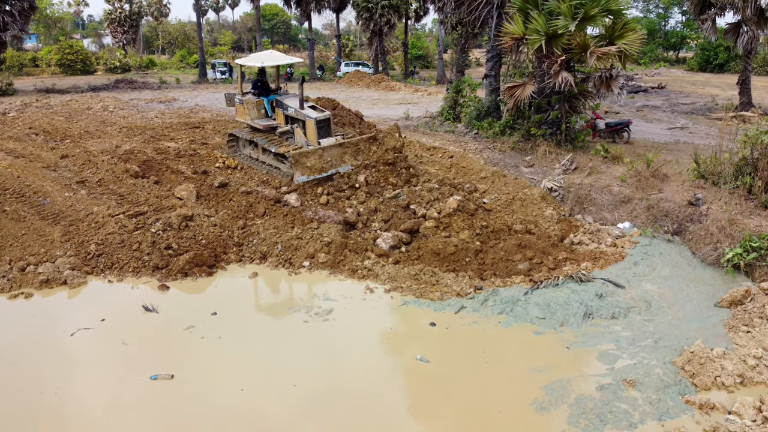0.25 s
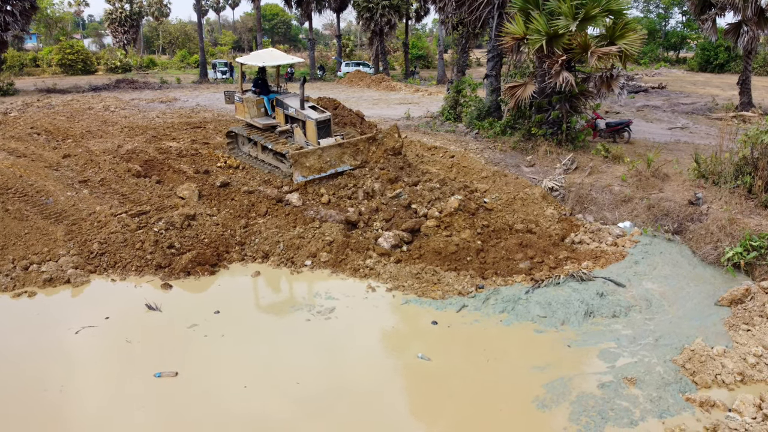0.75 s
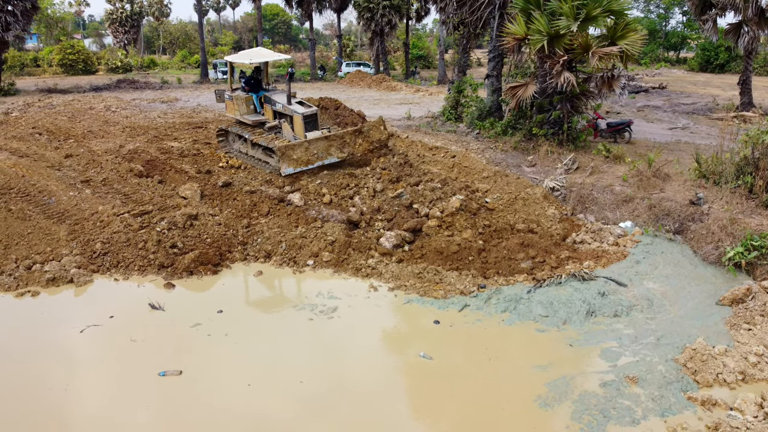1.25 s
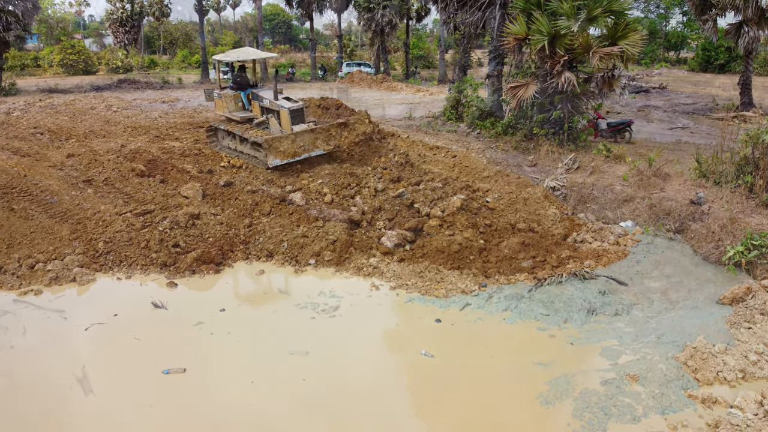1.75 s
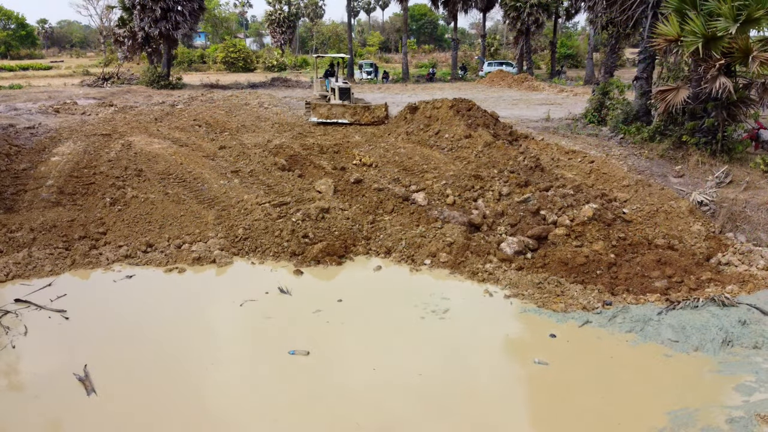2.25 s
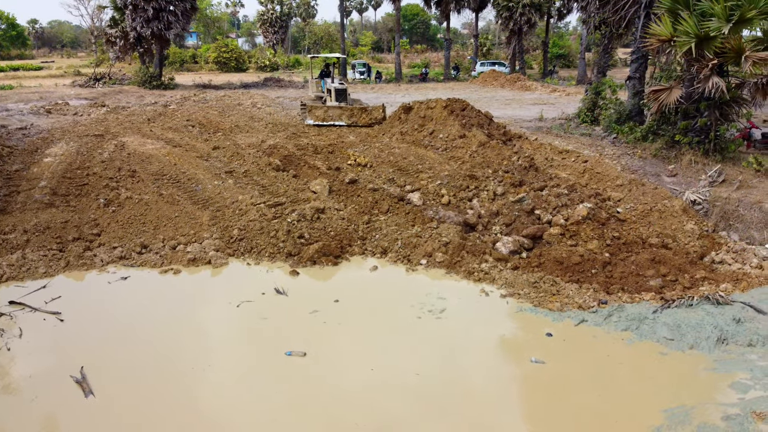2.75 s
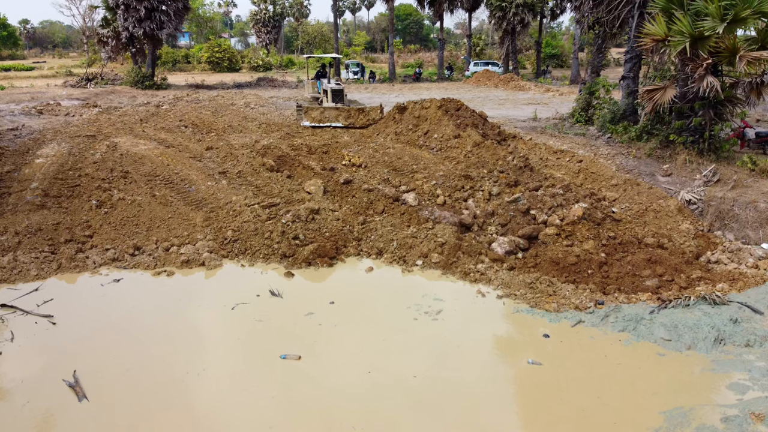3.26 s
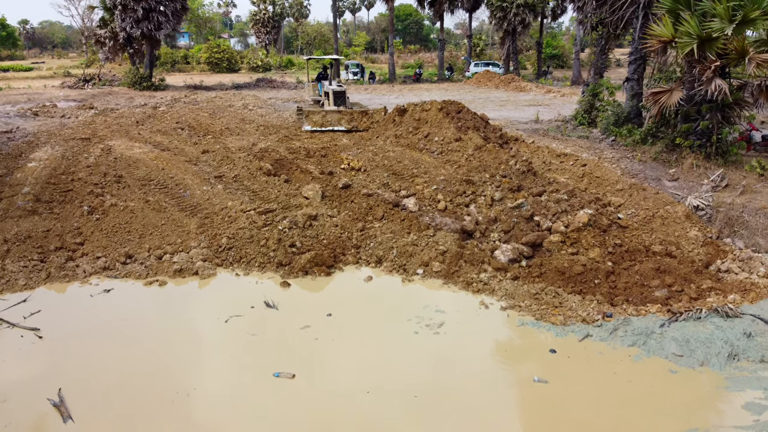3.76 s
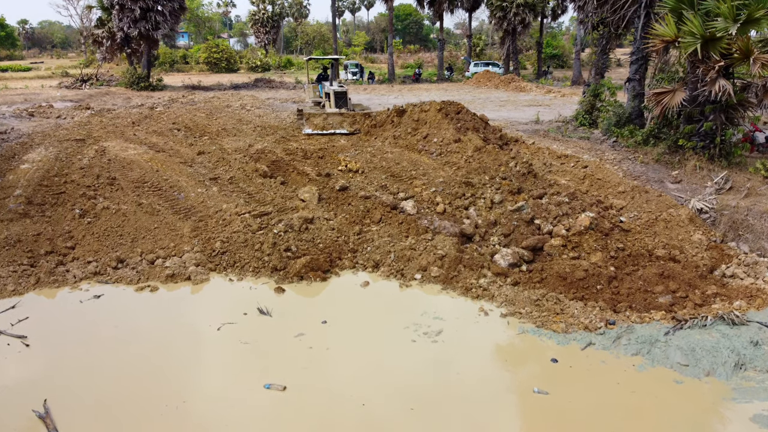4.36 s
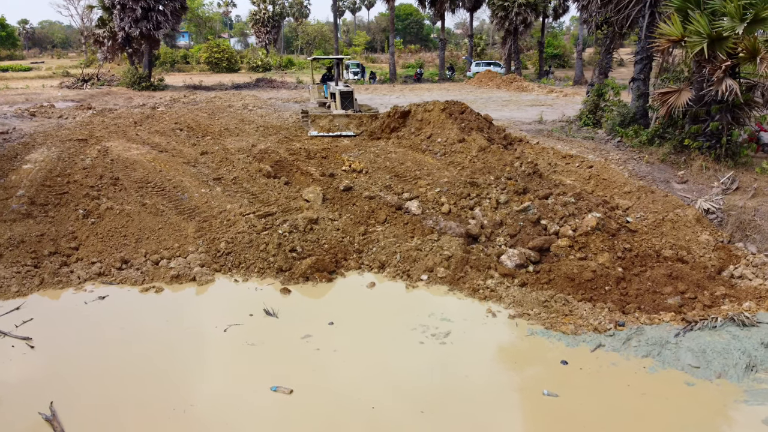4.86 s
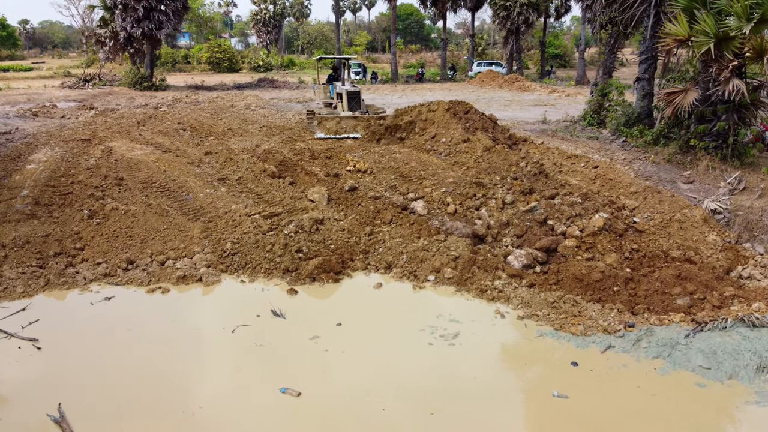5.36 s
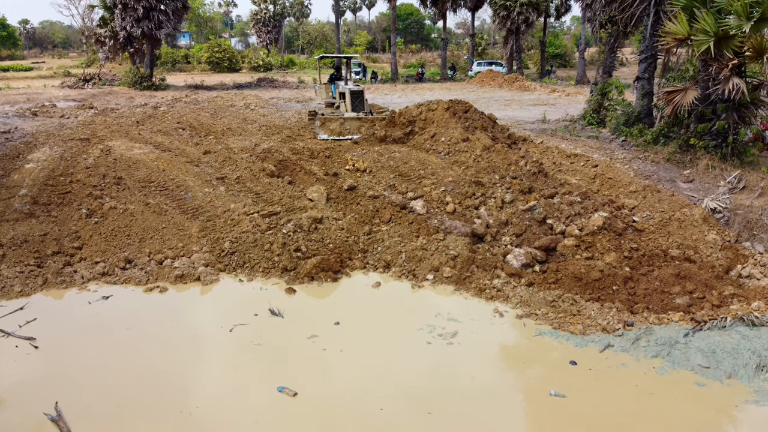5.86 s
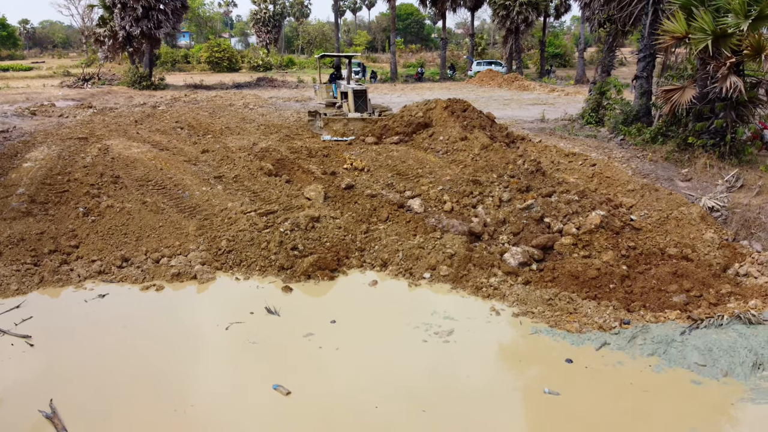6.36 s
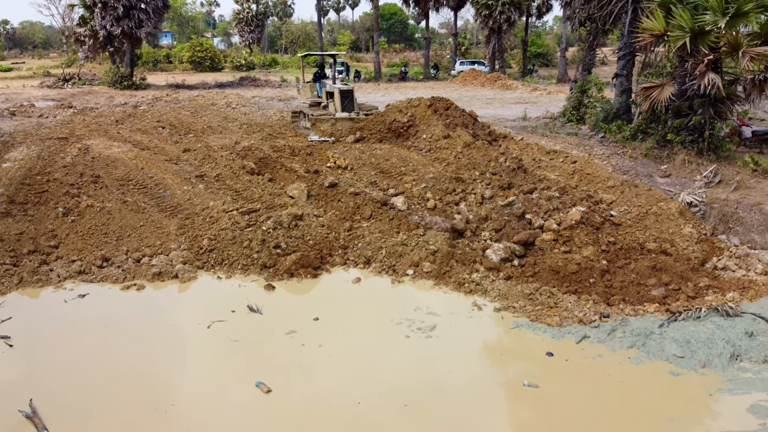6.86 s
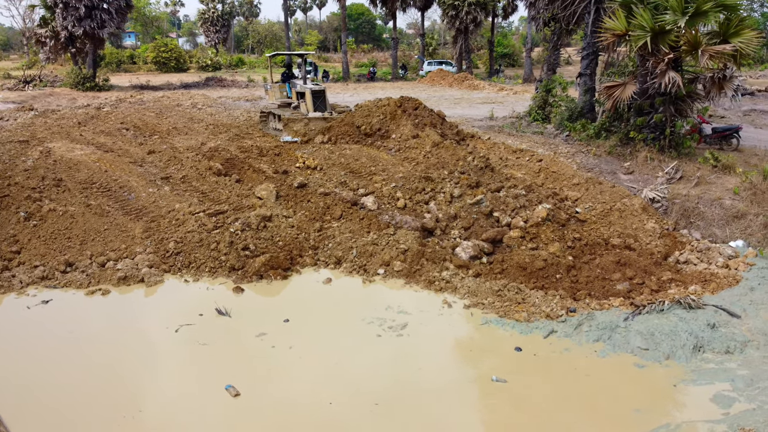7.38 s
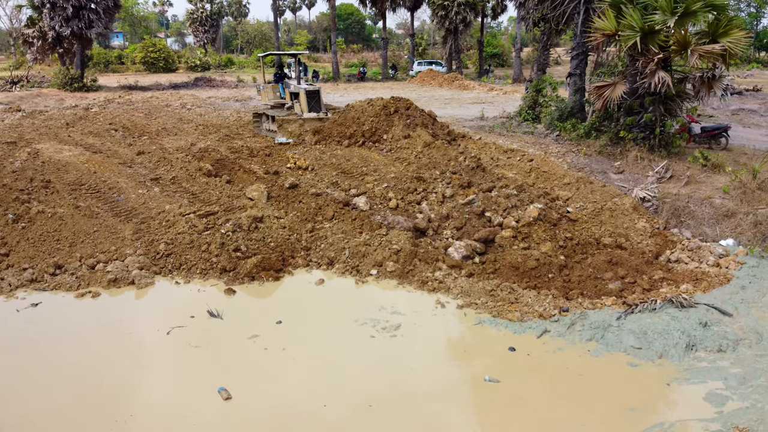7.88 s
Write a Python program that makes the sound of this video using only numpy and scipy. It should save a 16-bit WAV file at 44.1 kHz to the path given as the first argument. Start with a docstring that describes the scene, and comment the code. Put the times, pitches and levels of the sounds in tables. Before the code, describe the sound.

A bulldozer's diesel drones steadily across open ground, low pulsing exhaust and rough clattering roar, with stone thuds and thin metallic track squeaks.

```python
"""A bulldozer growls and clatters across an open field, heard from some way off, with squeaks and thuds.
Each firing of its four-cylinder diesel sends a low pulse down the exhaust, built from three sine waves.
It also knocks the engine block into ringing and spits a burst of hiss over a steady roar of noise.
A faint whine follows the engine speed. Short resonant noise makes the track links squeak, tink and click
now and then, and short groups of clicks ring the steel where stones thud on it."""
import sys
import numpy as np
from scipy import signal
from scipy.fft import rfft, irfft, next_fast_len
from scipy.io import wavfile

SR = 44100
rng = np.random.default_rng(int(sys.argv[2]) if len(sys.argv) > 2 else 0)


def unload_audio(sound):
    """Save the sound as a 16-bit wav file, at the path given as the first command line argument."""
    columns = np.transpose(np.atleast_2d(sound))
    # keep every value between -1 and 1, then stretch to whole-number steps
    steps = np.round(np.clip(columns, -1, 1) * 32767)
    wavfile.write(sys.argv[1], SR, steps.astype(np.int16))


N = 358091
SIZE = next_fast_len(N + 4096)   # FFT length, with room for filter tails
HZ = np.maximum(np.arange(SIZE // 2 + 1) * SR / SIZE, 1)   # frequency of each FFT bin

# Noise layers of the roar. Each row: low edge in Hz, high edge in Hz, share of the power that bursts
# at each firing (0-1), burst decay in seconds, spread of burst strength in dB.
NOISE_LAYERS = [(189, 428, 0.26, 0.0067, 1), (513, 910, 0.19, 0.0045, 4.5), (1020, 2340, 0, 0.00095, 4),
                (2110, 3300, 0.21, 0.0055, 7), (4020, 7530, 0.36, 0.0042, 3.5),
                (7670, 13800, 0.58, 0.0037, 2.5)]
# Loudness of the same layers. Each row: mean level in dB, shares of the swing of clatter, drone and
# treble that it follows, dB gained at the last bearing.
LAYER_LEVELS = [(-28.5, 0.35, 0.46, .05, 5), (-30, .02, 0.93, .02, -1.5), (-30, 0.54, .02, .05, 4),
                (-33, 0.48, .3, .2, 2), (-33.5, 0.074, 0.092, 0.27, -0.5), (-35, .05, .05, 0.69, 2)]
# How the machine works. Each row: time in seconds, clatter in dB, drone in dB, treble in dB.
# Only the swing of each column about its own mean is used.
WORK_SWINGS = [(0, -21.5, -26, -33.5), (.45, -23.5, -29, -34.5), (.8, -27, -26.5, -34),
               (1.2, -27, -27.5, -37.5), (1.55, -26.5, -27, -39.5), (1.8, -28.5, -32.5, -35.5),
               (2.05, -27, -32, -31.5), (2.3, -26, -28, -38.5), (2.96, -24, -33, -34),
               (3.5, -26.5, -29.5, -32), (4.3, -28, -28, -34), (5.1, -24, -29, -35),
               (5.5, -26.5, -29.5, -33.5), (6.26, -23, -31.5, -32.5), (7.05, -22.5, -32, -32),
               (7.55, -26, -28, -32), (7.85, -25.5, -28, -30), (8.12, -27, -25.5, -31)]
# Tone colour of the roar. Each row: frequency in Hz, relative density in dB per Hz.
ROAR_COLOUR = [(190, -38.5), (300, -37), (450, -38), (700, -43.5), (950, -43.5), (1200, -34), (1700, -36.5),
               (2000, -43.5), (3000, -47), (3800, -52), (4500, -55.5), (7000, -60.5), (11500, -54),
               (15700, -55)]
# Low noise of the exhaust. Each row: frequency in Hz, relative density in dB per Hz.
THROB_COLOUR = [(25, -60), (45, -31), (90, -31.5), (150, -29), (190, -43)]
THROB_DB = -26
BURST_JITTER_S = .0005
PATCHY_DB, PATCHY_HZ = 1.77, 1.6   # each noise layer also wanders by itself: rms swing and speed

# When the faint whine carries. Each row: start in seconds, end in seconds, level in dB.
WHINE_SPELLS = [(.5, 1.1, -36), (3.6, 5.9, -38), (7.9, 8.12, -41)]
WHINE_ORDER = 8.5   # cycles per firing

# Squeaks, tinks and a click of the track links. Each row: start in seconds, length before the fade
# in seconds, pitch in Hz, width of each resonance in Hz, level in dB.
LINK_SQUEAKS = [(2.36, 0.042, 11380, 4000, -29.5), (2.382, 0.02, 5300, 300, -40),
                (2.411, 0.013, 11150, 500, -22), (2.409, 0.0071, 5500, 1200, -31),
                (2.41, .004, 8000, 6000, -28), (2.714, 0.019, 11100, 500, -33),
                (6.298, .012, 10500, 300, -23), (6.323, 0.039, 10500, 500, -33),
                (6.574, 0.044, 9850, 500, -30.5), (6.658, 0.015, 3800, 300, -21),
                (6.805, 0.027, 12400, 250, -19), (7.485, .016, 11150, 900, -29),
                (7.584, 0.022, 10300, 1200, -29.5), (7.586, 0.015, 5530, 500, -29),
                (7.604, .014, 4800, 300, -32), (7.634, .022, 11900, 1200, -26),
                (7.649, 0.0339, 5500, 400, -33), (7.82, 0.036, 12240, 600, -25),
                (7.849, 0.035, 4782, 250, -31.5), (7.914, 0.021, 10300, 3000, -27.5)]

# Stones against blade and tracks. Each row: start in seconds, strength in dB before THUD_DB.
STONE_THUDS = [(2.125, -25), (2.454, -14), (2.748, -21), (2.914, -10.5), (2.989, -14.5), (3.105, -18),
               (3.176, -16), (3.361, -8.5), (3.665, -16), (5.386, -13.5), (5.765, -25), (7.205, -17),
               (7.476, -19), (7.822, -13.5)]
# Ringing of the struck steel. Each row: pitch in Hz, level in dB, time to die by 60 dB in seconds.
STEEL_MODES = [(430, -2, .02), (620, -2, .02), (790, -1, .025), (1050, -2, .015), (1400, -2, .015),
               (1800, -5, .012), (2500, -10, .008)]
THUD_DB = -7.5
RATTLE_S = .014   # the contacts of one stone spread over this time

# Ringing of pipe, block and panels. Each row: pitch in Hz, time to die by 60 dB in seconds for each
# of two resonances in a row, timing error of the blow in seconds.
BLOCK_MODES = [(250, .03, .0002), (295, .05, .0001), (375, .025, .0002), (510, .05, .0001),
               (780, .015, .0004), (1000, .04, .00006), (1185, .013, .00002), (1315, .03, .00003),
               (1500, .02, .00004), (1665, .035, .00002), (1790, .03, .00003), (2190, .02, .00006),
               (4520, .008, .0001), (5500, .008, .0001)]
# As the machine turns, each mode carries for a while. One list per mode, in the same order.
# Each row: start in seconds, end in seconds, level in dB before KNOCK_DB.
MODE_SPELLS = [
    [(.1, 1.55, -25.5), (5.8, 8.12, -37)],
    [(1.15, 2.8, -29), (4.1, 5.3, -27.5), (6.5, 7, -29), (7.76, 7.9, -16.5)],
    [(2.1, 3.4, -29.5), (3.9, 6.9, -22), (8, 8.12, -24)],
    [(.15, 1.2, -23.5), (3.9, 4, -30), (5.5, 8.12, -29.5)],
    [(0, 1.45, -26.5), (2.15, 3, -28), (7.8, 8.12, -27)],
    [(3.2, 3.4, -27), (5.8, 8.12, -27)],
    [(0, .55, -17.5), (1.4, 2.3, -27), (5.2, 6, -22.5), (6.15, 7.4, -19), (7.6, 8.12, -17)],
    [(.5, 1.3, -28), (1.8, 2.4, -24), (3.4, 5, -25), (5.2, 7.7, -29)],
    [(3.1, 3.6, -27.5), (5.1, 5.9, -27), (7.5, 7.7, -30)],
    [(0, .8, -25.5), (1, 1.5, -29.5), (3.7, 6, -23.5), (6.1, 8.12, -21.5)],
    [(6.6, 8.121, -27.5)],
    [(2.3, 2.95, -28), (6.5, 7.9, -28)],
    [(0, 1.3, -34), (3.3, 6.9, -36.5)],
    [(1.7, 3.3, -39.5)],
]
KNOCK_DB, KNOCK_SPREAD_DB = -8.5, 1.2
KNOCK_TRAVEL_S = .007   # longest delay before a blow reaches a part
FADE_DB_PER_S, TURNED_AWAY_DB = 42, -48.5   # fade around each spell, and the lowest spell level

# Engine. Each row: time in seconds, firings per second before the hunting,
# levels in dB of exhaust orders 1, 2 and 3 before the flutter.
ENGINE_RUN = [(0, 59.1, -14, -21.5, -32), (.2, 59, -13, -19.5, -26), (.7, 60.4, -13.5, -20.5, -28),
              (1.15, 60.6, -14, -21, -31), (1.62, 61.6, -15, -21, -37), (1.67, 61, -25, -20, -36),
              (1.73, 69, -37, -20, -48), (1.81, 64, -20, -17.5, -48), (1.87, 63, -16.5, -16.5, -41),
              (2.09, 54, -14, -21.5, -35), (2.23, 59, -12.5, -14, -32), (2.42, 61, -13, -17.5, -33),
              (3.2, 60.3, -12.5, -17.5, -37.5), (3.32, 56.5, -11.5, -19, -34),
              (3.57, 59, -11.5, -22.5, -43), (4.06, 58.2, -11, -17, -33), (4.3, 62, -12, -24.5, -28),
              (4.67, 58.5, -11.5, -18.5, -31), (5.03, 60.5, -12, -17.5, -33),
              (5.7, 59.6, -11.5, -16.5, -35), (6.1, 59.3, -13, -16.5, -29), (6.3, 57.4, -12, -24, -25),
              (6.55, 57.9, -12.5, -20, -25.5), (7, 57, -13, -22.5, -24), (7.44, 60, -14.5, -24.5, -23.5),
              (7.7, 57.7, -15.5, -26, -20.5), (7.88, 57, -18, -18, -19.5), (8.05, 56.5, -15.5, -25, -21),
              (8.12, 58, -11, -28, -25)]
# Uneven strength of the four cylinders. Each entry: level in dB.
CYLINDER_STRENGTH = [2, 1.5, -2.5, -1]
HUNT_PER_S, HUNT_HZ = .2, 3   # the governor hunts: rms swing in firings per second, and speed
# Each exhaust order flutters in level; the second also moves against the first.
# The entries are the rms swings of orders 1, 2 and 3 in dB before that trade.
ORDER_FLUTTER = [.5, 1.2, 3]
FLUTTER_HZ = 11.8
TRADE = 1.6   # when the first order flutters up, the second is pushed down (dB per dB)
PIPE_LAG = .035   # the upper orders leave the pipe behind the first (share of a firing)

# How alike left and right are. Each row: frequency in Hz, likeness (0-1).
LEFT_RIGHT_LIKENESS = [(60, .995), (300, .94), (600, .8), (1500, .95), (2300, .85), (2800, .65), (3600, .5),
                       (5500, .45), (7500, .6), (8500, .85), (15700, .85)]
# Phase at the two microphone ports for the machine's first bearing.
# Each row: frequency in Hz, radians by which left leads.
FIRST_LEAD = [(0, 0), (1890, 0.1), (2670, 3.1), (3190, 2.2), (4390, 5.0), (6550, 7.6), (7490, 5.5),
              (9730, 0.7), (11600, -2.8), (12300, -3.4), (12900, -6.0), (13700, -6.3), (14600, -9.2),
              (15300, -9.5)]
# The same for its last bearing. Each row: frequency in Hz, radians by which left leads.
LAST_LEAD = [(0, 0), (950, -1.3), (2500, 0.8), (3190, 0.3), (4480, 4.6), (7490, 6.4), (9730, 0.3),
             (10500, -0.1), (11300, -2.6), (12300, -3.6), (13100, -6.2), (13800, -6.3), (14600, -9.3),
             (15300, -9.5)]
# The ports differ in tone. Each row: frequency in Hz, left minus right in dB.
PORT_DIFFERENCE = [(60, -1), (290, -1.5), (640, 2), (1400, -3), (3100, 0.9), (5500, -2), (9000, 2),
                   (15000, 0)]
# Turn from first to last bearing. Each row: time in seconds, share of the last bearing (0-1).
BEARING_SHIFT = [(0, 0.08), (1.6, 0), (3, 0.42), (4.5, 0.83), (8.12, 0.98)]
# Balance as the bearing changes. Each row: time in seconds, left minus right in dB.
BEARING_BALANCE = [(0, -1.5), (1.2, -1), (2.7, -2), (4, -1.5), (6.2, -2.5), (7.4, -1.7), (8.12, -1.5)]
CUTOFF_HZ = 15700


def from_db(db):
    """Turns decibels into a gain."""
    return 10 ** (np.asarray(db) / 20)


def rms_one(x):
    """Scales a signal to an rms of 1."""
    return x / np.sqrt(np.mean(x ** 2) + 1e-20)


def in_time(rows):
    """Draws lines between the rows of a time table: one curve per column, one value per sample."""
    s, *columns = np.transpose(rows)
    t = np.arange(N) / SR
    return [np.interp(t, s, column) for column in columns]


def at_hz(points):
    """Reads a frequency table at every FFT bin, along a logarithmic pitch scale."""
    hz, value = np.transpose(points)
    return np.interp(np.log(HZ), np.log(np.maximum(hz, 1)), value)


def shaped(x, response):
    """Filters a signal by multiplying its spectrum."""
    return irfft(rfft(x, SIZE) * response, SIZE)[..., :N]


def ring(clicks, hz, t60):
    """Resonance: a click of 1 starts a sine of height about 1 that dies by 60 dB in t60 seconds."""
    r = from_db(-60 / (t60 * SR))
    w = 2 * np.pi * hz / SR
    return signal.lfilter([0, np.sin(w)], [1, -2 * r * np.cos(w), r * r], clicks + 1e-18)


def drift(hz):
    """Slow chance movement with rms 1: noise smoothed twice by a one-pole low-pass."""
    step = 40   # samples between the drawn values
    r = np.exp(-2 * np.pi * hz * step / SR)
    noise = rng.standard_normal(N // step + 2002)
    slow = signal.lfilter([1], [1, -2 * r, r * r], noise)[2000:]   # skip the run-in
    return np.interp(np.arange(N) / step, np.arange(len(slow)), rms_one(slow))


def carry_db(spells):
    """Full level during each spell, fading in before it and out after it."""
    t = np.arange(N) / SR
    levels = []
    for start, end, db in spells:
        seconds_away = np.maximum(np.maximum(start - t, t - end), 0)
        levels.append(db - FADE_DB_PER_S * seconds_away)
    return np.maximum(np.max(levels, axis=0), TURNED_AWAY_DB)


def firings(turns, spread_db, jitter_s):
    """One click per firing, uneven in strength and timing; a random cylinder comes first in the cycle."""
    at = np.flatnonzero(np.diff(np.floor(turns)) > 0)
    timing, strength = np.clip(rng.standard_normal((2, len(at))), -1.8, 1.8)
    first_cylinder = rng.integers(len(CYLINDER_STRENGTH))
    cylinders_db = np.resize(np.roll(CYLINDER_STRENGTH, first_cylinder), len(at))
    when = np.clip(at + np.round(timing * jitter_s * SR).astype(int), 0, N - 1)
    clicks = np.zeros(N)
    clicks[when] = from_db(cylinders_db + spread_db * strength)
    return clicks


def throb():
    """Low noise of the exhaust, in two unrelated draws."""
    low_pass = np.sqrt(1 + (HZ / THROB_COLOUR[-1][0]) ** 12)
    noise = shaped(rng.standard_normal((2, N)), from_db(at_hz(THROB_COLOUR)) / low_pass)
    return from_db(THROB_DB) * rms_one(noise)


def roar(turns):
    """Bands of noise, part steady and part bursting at each firing; two unrelated draws share one envelope."""
    out, colour = 0, from_db(at_hz(ROAR_COLOUR))
    swings_db = np.array([db - db.mean() for db in in_time(WORK_SWINGS)])
    last_bearing = in_time(BEARING_SHIFT)[0]
    for layer, (mean_db, *follows, turn_db) in zip(NOISE_LAYERS, LAYER_LEVELS):
        low_hz, high_hz, share, decay_s, spread_db = layer
        level_db = mean_db + follows @ swings_db + turn_db * last_bearing
        level_db = level_db + PATCHY_DB * drift(PATCHY_HZ)
        fade = np.exp(-1 / (decay_s * SR))
        clicks = firings(turns, spread_db, BURST_JITTER_S)
        bursts = signal.lfilter([1], [1, -2 * fade, fade * fade], clicks + 1e-18)
        # steady and bursting parts add up in power
        gate = np.sqrt(1 - share + share * rms_one(bursts) ** 2)
        band = colour / np.sqrt((1 + (low_hz / HZ) ** 12) * (1 + (HZ / high_hz) ** 12))
        noise = shaped(gate * rng.standard_normal((2, N)), band)
        out = out + from_db(level_db) * rms_one(noise)
    return out


def whine(turns):
    """A thin tone geared to the crank: a sine locked to engine speed, heard in spells."""
    return np.sqrt(2) * from_db(carry_db(WHINE_SPELLS)) * np.sin(2 * np.pi * WHINE_ORDER * turns)


def squeaks():
    """Squeaks, tinks and a click of steel on steel: short noise twice through a resonance, narrow or wide."""
    out = np.zeros(N)
    for s, length_s, hz, width_hz, db in LINK_SQUEAKS:
        t60 = np.log(1000) / (np.pi * width_hz)   # a narrower resonance rings longer
        noise = rng.standard_normal(4000)
        tone = rms_one(ring(ring(noise, hz, t60), hz, t60)[1000:])   # skip the run-in
        t = np.arange(len(tone)) / SR
        rise, fall = t / 0.00079, 1 + (length_s - t) / 0.0068
        shape = np.clip(np.minimum(rise, fall), 0, 1)
        out[round(s * SR):][:len(t)] += from_db(db) * shape * tone
    return out


def thuds():
    """Each stone lands as five uneven contacts that weaken a little with time and ring the steel."""
    out = np.zeros(N)
    # how far through the rattle each contact falls (0-1); the first is at once
    contacts = rng.random((len(STONE_THUDS), 5)) * np.arange(5) / 4
    for hz, mode_db, t60 in STEEL_MODES:
        clicks = np.zeros(N)
        strength = rng.normal(0, 3, contacts.shape)   # dB; its sign also sets the click's direction
        for (s, db), share, own_db in zip(STONE_THUDS, contacts, strength):
            when = np.round((s + share * RATTLE_S) * SR).astype(int)
            click_db = db + THUD_DB + mode_db + own_db - share
            clicks[when] = from_db(click_db) * np.sign(own_db)
        out += ring(clicks, hz, t60)
    return out


def knock(turns):
    """Every firing shakes the modes; the blow reaches each part a little later and builds up softly."""
    out = 0
    for (hz, t60, jitter_s), spells in zip(BLOCK_MODES, MODE_SPELLS):
        travel = round(rng.random() * KNOCK_TRAVEL_S * SR)
        blows = np.roll(firings(turns, KNOCK_SPREAD_DB, jitter_s), travel)
        ringing = ring(ring(blows, hz, t60), hz, t60)   # the second pass softens the start
        out = out + from_db(carry_db(spells) + KNOCK_DB) * rms_one(ringing)
    return out


def exhaust(turns, orders_db, uneven=0.044):
    """Three low orders make one lopsided pulse per firing, the upper two slightly late and swaying."""
    sway = 1 + uneven * np.cos(np.pi / 2 * turns)   # uneven cylinders: once every four firings
    orders = []
    for order, db in enumerate(orders_db, start=1):
        lag = PIPE_LAG if order > 1 else 0
        orders.append(-np.sqrt(2) * from_db(db) * np.cos(2 * np.pi * order * (turns - lag)))
    first, second, third = orders
    return first + sway * (second + third)


def engine_run():
    """Firings counted so far, and the fluttering level of each exhaust order."""
    rate, *orders_db = in_time(ENGINE_RUN)
    turns = np.cumsum(rate + HUNT_PER_S * drift(HUNT_HZ)) / SR
    first, second, third = [swing_db * drift(FLUTTER_HZ) for swing_db in ORDER_FLUTTER]
    return turns, np.array(orders_db) + [first, second - TRADE * first, third]


def ports(left, right, lead):
    """Each microphone port colours what reaches it and shifts its phase, in opposite ways left and right."""
    phase = np.interp(HZ, *np.transpose(lead))
    port = from_db(at_hz(PORT_DIFFERENCE) / 2) * np.exp(.5j * phase)
    return np.array([shaped(left, port), shaped(right, 1 / port)])


def scene():
    """Direct sound reaches both ports alike; sound scattered off the ground differs between them."""
    turns, orders_db = engine_run()
    shared, scattered = roar(turns) + throb()
    alike = at_hz(LEFT_RIGHT_LIKENESS)
    direct = whine(turns) + squeaks() + thuds() + knock(turns) + exhaust(turns, orders_db)
    mid = direct + shaped(shared, np.sqrt((1 + alike) / 2))
    side = shaped(scattered, np.sqrt((1 - alike) / 2))
    left, right = mid + side, mid - side
    # the machine turns: blend from its first bearing towards its last
    shift = in_time(BEARING_SHIFT)[0]
    pair = (1 - shift) * ports(left, right, FIRST_LEAD) + shift * ports(left, right, LAST_LEAD)
    balance = from_db(in_time(BEARING_BALANCE)[0] / 2)
    return pair * [balance, 1 / balance]


def record(dry):
    """Rounds the peaks gently, then cuts steeply above the cutoff."""
    rounded = 1.5 * np.tanh(dry / 1.5)
    low_pass = signal.ellip(14, .3, 80, CUTOFF_HZ, fs=SR, output="sos")
    return signal.sosfilt(low_pass, rounded)


dry = scene()
out = record(dry)
unload_audio(out)
```